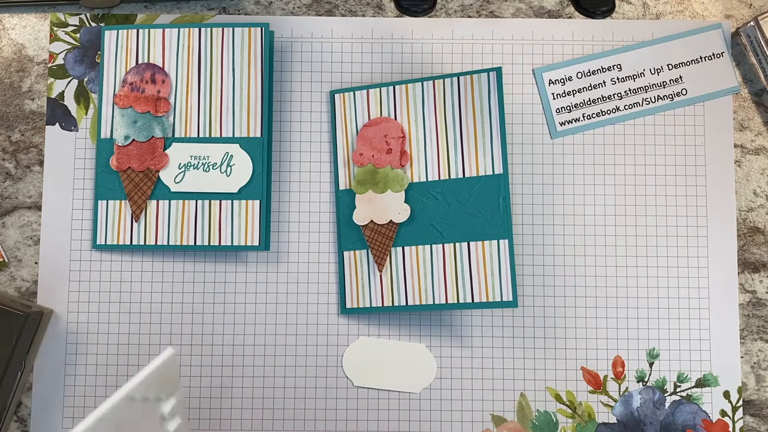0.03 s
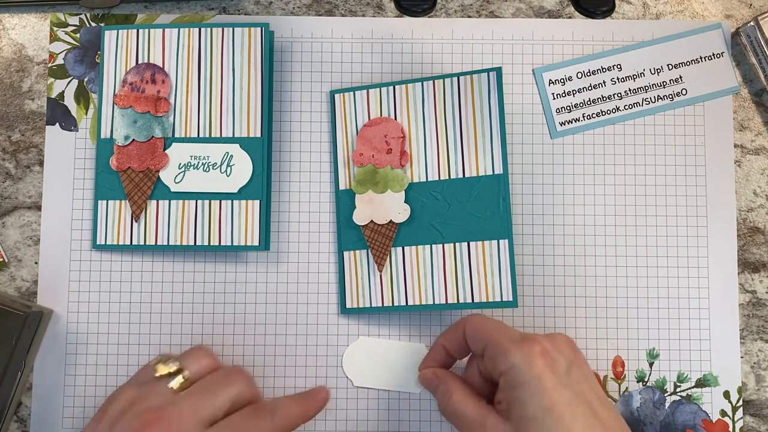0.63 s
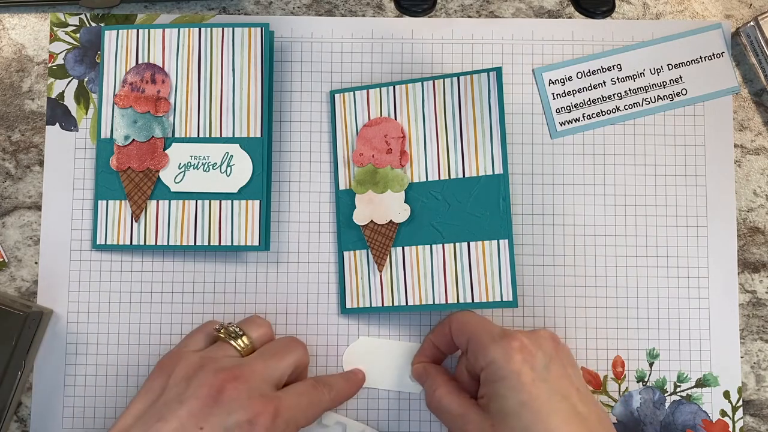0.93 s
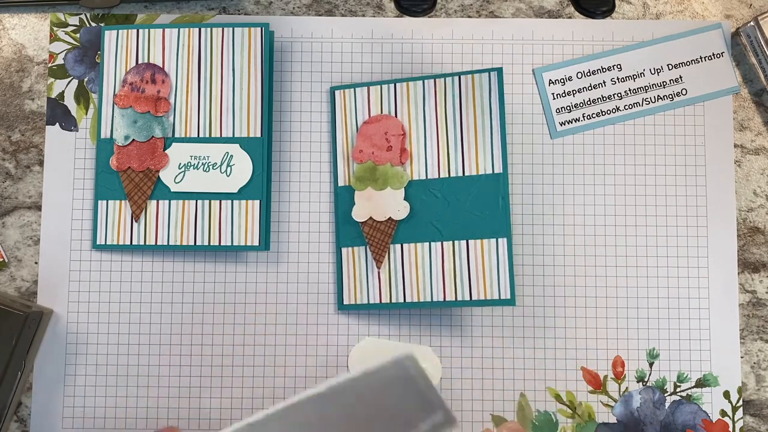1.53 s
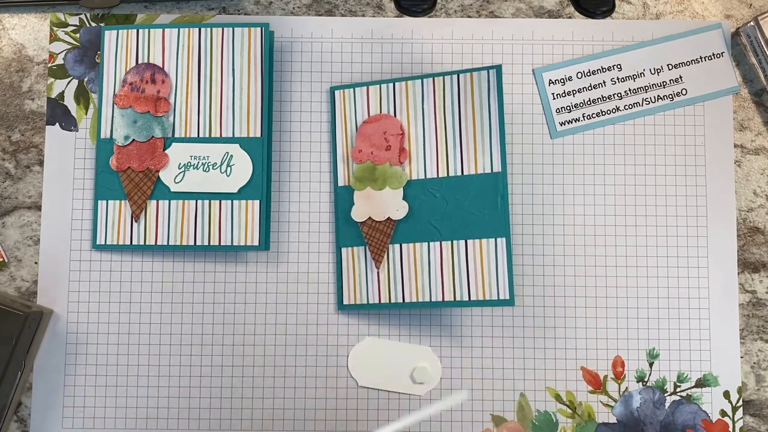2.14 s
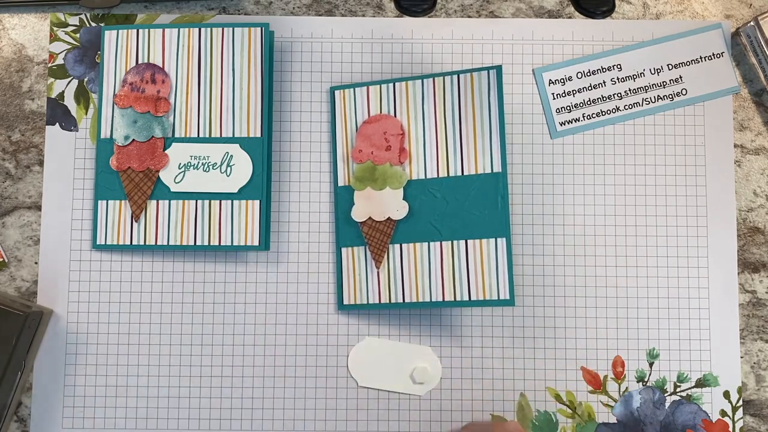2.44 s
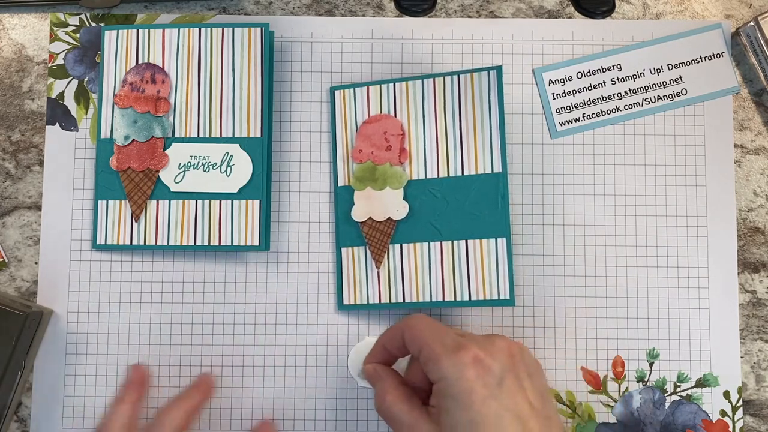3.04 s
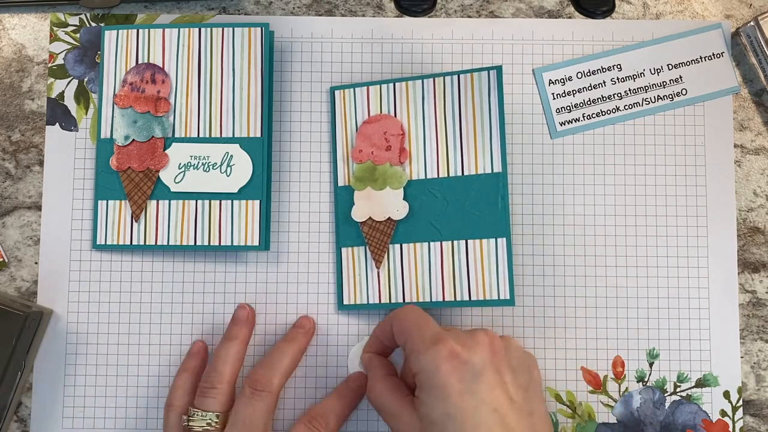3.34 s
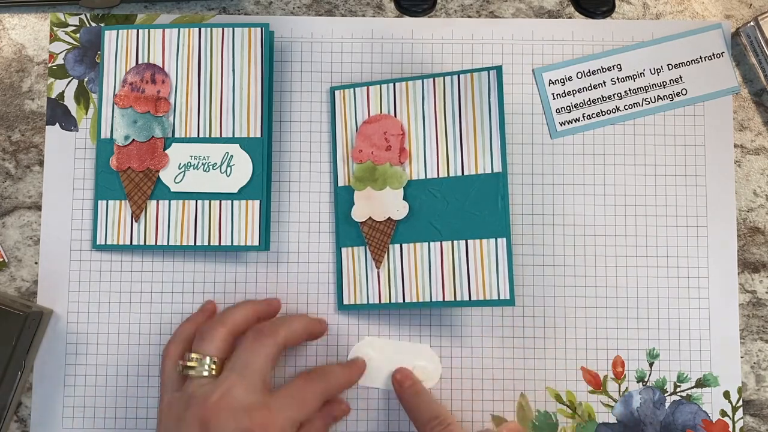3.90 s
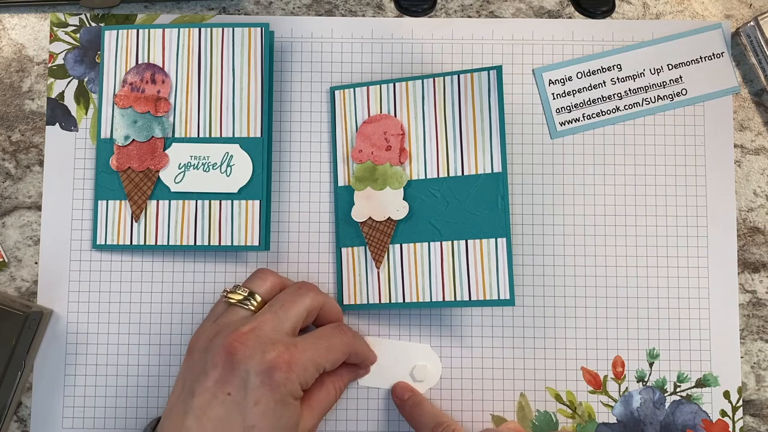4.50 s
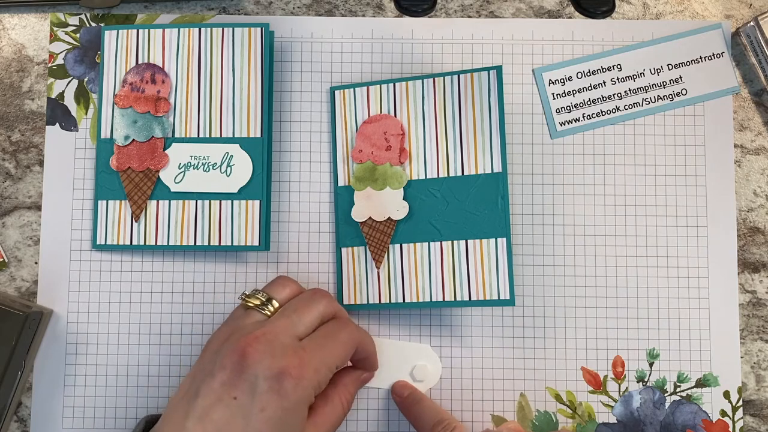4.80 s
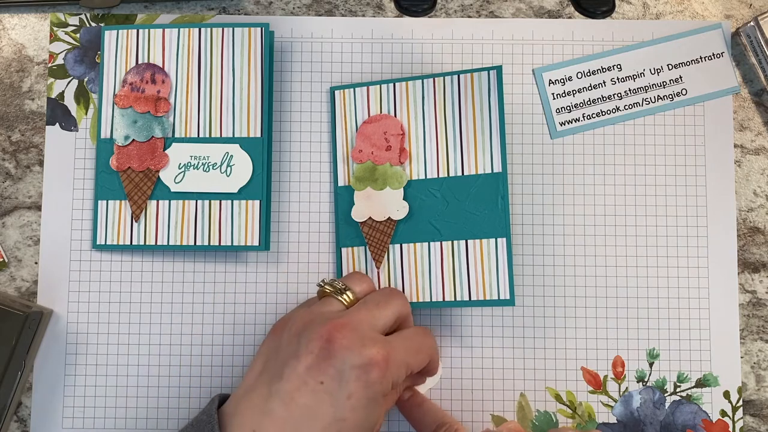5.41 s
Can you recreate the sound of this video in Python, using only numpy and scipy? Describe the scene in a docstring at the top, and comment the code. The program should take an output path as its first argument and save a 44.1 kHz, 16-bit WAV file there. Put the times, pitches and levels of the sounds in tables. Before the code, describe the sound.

In a small quiet room, a microphone over a desk picks up crisp little snaps and crackles of glue and backing paper letting go as foam dots are peeled off. Two snaps stand out, one early and one past the middle, with a floppy sheet softly set down between them. Fingers brush the card, hands bump the desk gently, and smaller clicks finish, all over a faint low hum.

```python
"""Sticking foam dots on a card tag

Foam adhesive dots are picked off their sheet and pressed onto a tag on a desk, in a small quiet room.
Glue and backing paper let go in sharp snaps, fingertips rub the paper, and the sheet lands with soft
knocks. Two low hums beat against each other. Two closely spaced microphone ports hang above the desk."""
import sys
import numpy as np
from scipy import signal
from scipy.fft import rfft, irfft
from scipy.io import wavfile
from scipy.ndimage import uniform_filter1d

SR = 44100
rng = np.random.default_rng(int(sys.argv[2]) if len(sys.argv) > 2 else 0)


def int16_out(signal):
    """Quantize to a 16-bit WAV file."""
    q = np.round(np.clip(np.atleast_2d(signal).T, -1, 1) * 32767)
    wavfile.write(sys.argv[1], SR, q.astype(np.int16))


N = 244755
TIME = np.arange(N) / SR

# Glue and paper letting go. Each row: start in seconds, peak in dB, tilt toward treble in dB per octave,
# trailing crackle in dB, bass boost in dB, note of the paper flap in Hz.
SNAPS = [(.1719, -38.5, -5.5, -20, 0, 5960), (.441, -38.5, 0, -14, -5, 7640),
         (0.696, -48.5, -16, 7, -21, 2960), (0.7958, -35.5, -3.5, -11, 4, 9500),
         (0.945, -41, 2, 2, -14, 11100), (0.97, -46, 10, 0, 2, 11500),
         (1.066, -28.5, 0.5, -9.5, -7.5, 11200), (1.1358, -4, 2.5, -1, 1.5, 11300),
         (1.1392, -17, -1, -0.5, -2, 9200), (1.1473, -19.5, -2.5, -1.5, -14.5, 7460),
         (1.5954, -34, -3, -2, 0.5, 11200), (2.054, -33, -1, -10, -5, 11100),
         (2.0626, -26.5, 6.5, 7, -4, 10660), (2.066, -34, -3.5, -3.5, 0, 10300),
         (2.0738, -27, -0.5, -13, 6.5, 7200), (2.083, -21.5, -2, -11, -4, 8600),
         (2.0863, -19.5, -6, 1, -17.5, 8720), (2.089, -22.5, 5, 7.5, 3, 10900),
         (2.487, -39, -15, 5, -26, 6030), (2.7006, -38, -13, -1.5, -20, 3900),
         (3.252, -41.5, 2, -7, -14.5, 7200), (3.391, -9.5, 0.5, 2.5, 1.5, 7640),
         (3.7345, -39.5, -5.5, -1, -20, 10000), (4.4105, -46, -2, -11, -2, 9900),
         (4.4296, -29.5, 3.5, 1.5, 7.5, 7940), (4.4685, -41.5, -4.5, -4, -15.5, 9460),
         (4.503, -37.5, 1.5, -8, -12.5, 9700), (4.518, -40.5, -2.5, -11, -15, 10740),
         (4.6146, -38, -1.5, -2, -17, 10800), (4.6412, -27.5, 18, -5, -4.5, 11000),
         (4.652, -38, 19, -8, -6, 10500), (4.6556, -15.5, -1, -3.5, -6.5, 7760),
         (4.662, -24, -2, -1, -24, 9500), (4.7195, -37.5, -1, -1, -14, 11300),
         (4.723, -24, -2, -0.5, -13, 8230), (4.7261, -37.5, -1, 4.5, 6, 7400),
         (5.1055, -32.5, 5, -4, 16, 9430), (5.377, -34.5, 6.5, -2, -6, 10000),
         (5.3858, -27.5, 8, -2, 6, 10550), (5.39, -27.5, 8.5, 5.5, 16, 9500),
         (5.4982, -48.5, 15, -0.5, 4.5, 11000), (5.5205, -46.5, -2, -7, -7, 11000),
         (5.531, -31.5, 10, 6, 4, 11100), (5.534, -25.5, 8.5, 3, 10, 10200)]
# The tone of a snap. Each row: frequency in Hz, level in dB.
SNAP_COLOUR = [(100, -35), (400, -21), (1100, -25.5), (2400, -22), (3200, -22.5), (4500, -15.5),
               (6000, -17.5), (7500, -7), (10000, 1), (11500, -5), (12800, -4), (15000, -14), (16500, -28)]


def snaps(lead_db=-11, lead_s=0.0017, crackle_s=0.0012, scatter_db=-9, scatter_s=0.0078,
          note_db=5, note_width=0.061, size=2048):
    """A few fibres give way, a glue strand breaks, more fibres follow; hands and desk scatter the sound."""
    out, hz, t = np.zeros(N), bins(size), TIME[:size]
    octaves = np.log2(np.clip(hz, 1000, 14000) / 10000)
    for start, db, tilt_db, crackle_db, bass_db, note_hz in SNAPS:
        first_fibres, later_fibres, paths = rng.standard_normal((3, size))
        bass = bass_db / (1 + (hz / 2400) ** 4)  # more moving paper gives more bass
        flap = note_db / (1 + ((hz / note_hz - 1) / note_width) ** 2)
        pulse = impulse(read(SNAP_COLOUR, hz) + tilt_db * octaves + bass + flap)
        pulse /= abs(signal.hilbert(pulse)).max()
        lead = amp(lead_db) * spray(first_fibres, np.exp(-t / lead_s))[::-1]
        crinkle_s = crackle_s * np.exp(-0.07 * (db + 10))  # weak snaps let go more slowly
        trail = amp(crackle_db) * spray(later_fibres, t * np.exp(-2 * t / crinkle_s))
        trail += amp(scatter_db) * spray(paths, np.sqrt(t) * np.exp(-t / scatter_s))
        snap = signal.fftconvolve(pulse, np.concatenate([lead, [1], trail]))
        add(out, start - size / SR, amp(db) * snap)
    return out


# Runs of tiny glue ticks. Each row: start in seconds, length in seconds, final level in dB.
PEELS = [(2.056, 0.035, -62), (4.43, 0.023, -55), (4.628, 0.044, -52.5), (4.68, 0.03, -58),
         (5.312, 0.093, -53)]


def peeling(growth_db_per_s=331, release_s=0.0051, tilt_db=4):
    """Thin glue strands break one after another, louder as the pull grows, until the dot comes free."""
    level = np.zeros(N)
    for start, length, db in PEELS:
        remaining = start + length - TIME
        pull = amp(db - growth_db_per_s * np.maximum(remaining, 0))
        level += (TIME > start) * pull * np.exp(np.minimum(remaining, 0) / release_s)
    colour = [(hz, db + tilt_db * np.log2(hz)) for hz, db in SNAP_COLOUR]
    return level * unit(tint(friction(per_s=1500, spread_db=4, hiss=0.11), colour))


# Sheet and hand landing. Each row: start in seconds, level in dB, tilt toward treble in dB per octave,
# rise in seconds, seconds for the flutter to fade 60 dB, hollow note in Hz, that note's gain in dB.
KNOCKS = [(0.107, -66, -14, 0.0062, 0.047, 395, -8), (0.223, -64, -9, 0.0042, 0.11, 421, -12),
          (0.437, -52.5, -0.5, 0.0044, 0.033, 855, -3), (.446, -57.5, -1, 0.0033, 0.055, 250, 1),
          (0.533, -56, -2.5, 0.0025, 0.018, 385, 0.5), (1.314, -65, -6.5, 0.002, .1, 410, -4),
          (1.34, -61, -2.5, 0.0024, 0.11, 394, -6), (1.6901, -51.5, -0.5, 0.0053, 0.076, 464.7, 6),
          (1.7717, -57, -1, 0.0028, 0.027, 391, 0.5), (2.077, -63.5, -6, 0.0049, 0.098, 417, -8),
          (2.4857, -55.5, -1, .0033, 0.18, 425, -0.5), (2.494, -53.5, 0.5, 0.0023, 0.25, 212.4, 6),
          (2.537, -50, -2, 0.0047, 0.17, 536, -1.5), (2.714, -69, 1, 0.0082, 0.29, 661, -1),
          (3.39, -71.5, -5.5, 0.0036, 0.017, 182, 5.5), (3.736, -77, 2, 0.013, 0.23, 1050, 1),
          (4.655, -66.5, 1, 0.0014, 0.047, 476, 1.5), (4.733, -71, 2.5, 0.004, 0.11, 955, -4.5)]
# The tone of a knock. Each row: frequency in Hz, level in dB.
KNOCK_COLOUR = [(80, -20.5), (200, -1.5), (350, -5.5), (550, -4), (750, -4.5), (1100, -8), (2000, -14.5),
                (3500, -20), (7000, -26.5), (11000, -30), (16000, -64)]
# Where the card stack rings. Each row: frequency in Hz, width in Hz, strength in dB.
CARD_RESONANCES = [(343, 60, 5), (530, 90, -1), (950, 260, 0.5), (1250, 130, -6), (1600, 250, -6),
                   (2000, 150, -2)]


def knocks(bend_s=0.011, swell_s=0.011, sag=0.14, waver=0.088, overtone=2.1, overtone_db=-6, size=8192):
    """The floppy sheet slaps and flutters, ringing the card stack, then flexes with a hollow note."""
    out, hz, t = np.zeros(N), bins(size), TIME[:size]
    ring = 1 + sum(amp(db) / (1 + (2 * (hz - f) / width) ** 2) for f, width, db in CARD_RESONANCES)
    body_db = read(KNOCK_COLOUR, hz) + 20 * np.log10(ring)
    octaves = np.log2(np.clip(hz, 400, 6000) / 400)
    # low bending waves travel slowly, so each slap is a short falling chirp
    delay = 2 * bend_s / (1 + hz / 300)
    chirp = np.exp(-2j * np.pi * np.cumsum(delay) * hz[1])
    age = t / swell_s
    fade = np.exp(-age ** 2 / 2)
    for start, db, tilt_db, rise, t60, note_hz, note_db in KNOCKS:
        contacts = rng.standard_normal(size)
        slap = irfft(chirp / np.hypot(1, hz * rise / 4.4))  # a slower landing is duller
        flutter = spray(contacts, (1 - np.exp(-(t / rise) ** 2)) * amp(-60 * t / t60))
        knock = signal.fftconvolve(slap + flutter, impulse(body_db + tilt_db * octaves))[:size]
        # the grip sets the note, which wavers and sinks as the sheet relaxes
        wobble = waver * unit(uniform_filter1d(contacts, size=200))
        phase = 2 * np.pi * np.cumsum(note_hz * (1 + sag * np.exp(-age) + wobble)) / SR
        note = 2 * age * fade * (np.sin(phase) + amp(overtone_db) * fade * np.sin(overtone * phase))
        add(out, start, amp(db) * (knock / knock[:size // 8].std() + amp(note_db) * note))
    return out


# Short bands of paper noise. Each row: middle in seconds, half length in seconds, level in dB,
# centre frequency in Hz, width in octaves.
PAPER_NOISES = [(0, 0.034, -63, 5260, 1.16), (0.148, 0.098, -74, 3080, 1.34), (0.747, 0.029, -65, 3760, 9),
                (0.83, 0.035, -72.5, 4000, 4.5), (0.927, 0.025, -63, 10400, 0.33),
                (0.986, 0.02, -72.5, 1660, 0.82), (1.186, 0.041, -63, 5650, 0.73),
                (1.277, 0.026, -70, 3970, 0.75), (1.31, 0.012, -61, 4540, 1.45),
                (1.603, 0.013, -66, 3920, 0.9), (1.836, 0.019, -64.5, 3720, 3.1),
                (2.088, 0.015, -52.5, 6040, 0.82), (2.492, 0.0045, -50.5, 2340, 0.88),
                (2.541, 0.0032, -51.5, 2000, 0.52), (2.542, 0.002, -48, 3860, 0.17),
                (2.553, 0.018, -52, 1670, 0.6), (2.572, 0.042, -59.5, 3020, 1.6),
                (2.605, 0.088, -74, 3820, 1.1), (2.726, 0.019, -61.5, 5900, 3.2),
                (3.443, 0.042, -64, 5750, 0.8), (4.717, 0.048, -72, 4570, 0.76)]


def paper_noises(skirt_db=-18):
    """Short bands of paper noise: brushing swells, the rasp of peeling, brief clacks as the sheet lands."""
    out, hz = np.zeros(N), bins(N)
    spectrum = rfft(friction(per_s=1500, spread_db=4.2, hiss=1))
    for middle, half, db, centre_hz, width_octaves in PAPER_NOISES:
        band = np.exp(-(np.log2((hz + 1) / centre_hz) / width_octaves) ** 2)
        band += amp(skirt_db) / np.hypot(1, hz / centre_hz)
        out += amp(db) * unit(irfft(spectrum * band, N)) * np.exp(-((TIME - middle) / half) ** 2)
    return out


# Finger strokes. Each row: start in seconds, length in seconds, level in dB at average pressure.
RUBS = [(0, 0.0072, -68), (0.148, 0.11, -79.5), (0.438, 0.55, -76.5), (0.736, 0.02, -70.5),
        (0.862, 0.031, -67.5), (0.97, 0.2, -67), (1.17, 0.14, -62), (1.363, 0.014, -73), (1.61, .2, -76.5),
        (1.817, .02, -70.5), (1.951, 0.19, -68), (2.543, 0.025, -66), (2.922, 0.068, -84.5),
        (3.238, 0.033, -77.5), (3.34, 0.19, -69), (3.786, .025, -77), (3.883, 0.18, -75),
        (4.157, 0.13, -70.5), (4.409, 0.034, -74), (4.65, 0.038, -69), (5.134, 0.062, -76),
        (5.353, 0.057, -87)]
# The tone of rubbing. Each row: frequency in Hz, level in dB.
RUB_COLOUR = [(300, -31.5), (1500, -16.5), (3000, -21), (5500, -17.5), (8000, -6), (10300, -0.5),
              (12000, -4), (13500, -13), (16000, -28)]


def rubbing(attack_s=0.027, release_s=0.055, resting_db=-91, pressure_db=4.5):
    """Soft fingertips drag on paper and foam with a fine hiss that follows their unsteady pressure."""
    level = np.full(N, amp(resting_db))  # resting fingers still stir the paper
    for start, length, db in RUBS:
        fade = np.maximum(start - TIME, 0) / attack_s + np.maximum(TIME - start - length, 0) / release_s
        level = np.maximum(level, amp(db) * np.exp(-fade))
    pressure = np.interp(TIME, np.arange(300) / 50, rng.standard_normal(300))
    drag = unit(tint(friction(per_s=5000, spread_db=3, hiss=1), RUB_COLOUR))
    return level * amp(pressure_db * pressure) * drag


# A fingernail on card and foam. Each row: middle in seconds, level in dB, chatter note in Hz.
SCRAPES = [(0.619, -59, 2450), (1.686, -58, 2000), (3.828, -56, 6370), (4.11, -59.5, 10200),
           (5.011, -69, 2420)]


def scrapes(half_s=0.0045, note_db=13, note_width=0.086):
    """A nail slips in a quick run of catches, and the edge under it chatters at its own note."""
    out, hz = np.zeros(N), bins(N)
    spectrum = rfft(tint(friction(per_s=2500, spread_db=3, hiss=0.65), RUB_COLOUR))
    for middle, db, note_hz in SCRAPES:
        edge = amp(note_db / (1 + ((hz / note_hz - 1) / note_width) ** 2))
        out += amp(db) * unit(irfft(spectrum * edge, N)) * np.exp(-((TIME - middle) / half_s) ** 2)
    return out


# Hands settling on the desk. Each row: start in seconds, level in dB.
BUMPS = [(.44, -44.5), (.962, -47), (1.152, -47.5), (3.28, -51.5), (3.405, -46), (3.803, -49.5),
         (4.138, -43.5)]


def bumps(desk_hz=72, swell_s=0.011):
    """The soft weight of a hand sways the desk top for a few low cycles."""
    out, t = np.zeros(N), TIME[:SR // 2]
    sway = t / swell_s * np.exp(1 - t / swell_s) * np.sin(2 * np.pi * desk_hz * t)
    for start, db in BUMPS:
        add(out, start, amp(db) * sway)
    return out


# Motor hum, mains hum and the octave above the mains. Each row: frequency in Hz, level in dB.
HUMS = [(52.53, -55.4), (59.91, -56.5), (119.82, -80)]
# The tone of room noise that both ports share. Each row: frequency in Hz, level in dB.
AIR_SHARED = [(20, -26), (38, -13.5), (52, 1.5), (70, 4), (100, -6), (160, -13), (300, -21), (600, -30),
              (1300, -41.5), (3000, -46.5), (7000, -48.5), (10300, -50), (13000, -62), (16000, -73)]
# The tone of room noise that is opposite in the two ports. Each row: frequency in Hz, level in dB.
AIR_OPPOSED = [(20, -20), (60, 8), (100, -8), (300, -18), (900, -26), (3000, -38.5), (7000, -39),
               (10300, -41), (16000, -48.5)]


def background(in_step_s=0.11, shared_db=-63.2, opposed_db=-70.2):
    """A motor and the mains hum a few Hz apart and throb, over faint room noise."""
    hum = sum(amp(db) * np.sqrt(2) * np.cos(2 * np.pi * hz * (TIME - in_step_s)) for hz, db in HUMS)
    shared = hum + amp(shared_db) * unit(tint(rng.standard_normal(N), AIR_SHARED))
    opposed = amp(opposed_db) * unit(tint(rng.standard_normal(N), AIR_OPPOSED))
    return np.array([shared + opposed, shared - opposed])


# How long the room rings. Each row: frequency in Hz, seconds to fade 60 dB.
ROOM_FADE = [(150, 0.96), (600, 0.76), (2500, 0.21), (6000, 0.065), (10000, 0.2), (15000, 0.031)]
# The tone of the room's echoes. Each row: frequency in Hz, gain in dB.
ROOM_COLOUR = [(200, -2), (450, 1.5), (1000, 7), (2200, 6), (4000, 7.5), (7000, 8), (10000, -3.5)]
# The part of the echoes that arrives from all around. Each row: frequency in Hz, gain in dB.
ALL_AROUND = [(200, -9.5), (1000, -6), (4000, 2.5), (10000, -6)]


def reflections(fingers, sheet, desk_db=-15, desk_fade_s=0.057, fingers_db=-18.5, sheet_db=-15.5):
    """Sound bounces off desk and room; the sheet, off at the desk's edge, stirs more of the room."""
    desk = amp(desk_db) * echoes(fingers + sheet, [(100, desk_fade_s), (16000, desk_fade_s)], 0.0026)
    into_room = tint(amp(fingers_db) * fingers + amp(sheet_db) * sheet, ROOM_COLOUR)
    frontal, around = desk + echoes(into_room, ROOM_FADE, delay_s=0.0065)
    return ports(frontal) + tint(around, ALL_AROUND) * np.array([[1], [-1]])


def echoes(x, fade_times, delay_s, drift_per_s=0.9):
    """Two sets of dense, fading echoes whose pattern drifts as the hands move."""
    hz, t, noise = signal.stft(rng.standard_normal((2, 2, SR // 2)), SR, nperseg=256)
    tails = signal.istft(noise * amp(-60 * t / read(fade_times, hz)[:, None]), SR, nperseg=256)[1]
    tails /= np.linalg.norm(tails, axis=2, keepdims=True)
    tails = np.pad(tails, ((0, 0), (0, 0), (round(delay_s * SR), 0)))
    turn = np.pi * drift_per_s * TIME
    feeds = x * np.array([np.cos(turn), np.sin(turn)])
    return signal.fftconvolve(feeds[:, None], tails, axes=2).sum(0)[:, :N]


# The left port compared with the right. Each row: frequency in Hz, phase lead in radians, gain in dB.
PORTS = [(100, 0, 0), (500, .6, 2.8), (780, 1.8, 3), (2500, .2, 4), (4000, 1.4, 4.8), (6000, .1, 3),
         (7600, -1.2, 4), (8100, -3.3, 0), (9000, -3.8, -.3), (10000, -5.3, 0), (11500, -6.8, 0),
         (14000, -10.2, 0), (15200, -12.4, 0)]


def ports(x):
    """Sound from the desk reaches the two microphone ports with different timing and strength."""
    table, hz = np.array(PORTS), bins(N)
    lead, gain_db = read(table[:, :2], hz), read(table[:, ::2], hz)
    left = amp(gain_db / 2) * np.exp(0.5j * lead)
    return irfft(rfft(x) * np.array([left, 1 / left]), N)


def friction(per_s, spread_db, hiss):
    """Paper fibres catch and slip in tiny clicks of uneven size, over a smooth hiss."""
    size = amp(spread_db * np.minimum(rng.exponential(1, N), 3))
    slips = size * rng.standard_normal(N) * (rng.random(N) < per_s / SR)
    return unit(unit(slips) + hiss * rng.standard_normal(N))


def spray(noise, envelope):
    """A burst of tiny random pulses that follows a loudness curve, with a total energy of one."""
    for _ in range(6):  # each pass evens out the spectrum
        noise = irfft(np.exp(1j * np.angle(rfft(noise * envelope))))
    burst = noise * envelope
    return burst / np.linalg.norm(burst)


def impulse(db):
    """The most compact click that starts at time zero and has this spectrum."""
    cepstrum = irfft(np.log(amp(db)))
    half = len(cepstrum) // 2
    cepstrum[1:half] *= 2
    cepstrum[half + 1:] = 0
    return irfft(np.exp(rfft(cepstrum)))


def tint(x, points):
    """Turns each frequency of a full-length sound up or down by a table."""
    return irfft(rfft(x) * amp(read(points, bins(N))), N)


def read(points, hz):
    """Reads between a table's rows on a log-frequency scale."""
    f, value = np.transpose(points)
    return np.interp(np.log(hz + 1), np.log(f + 1), value)


def bins(size):
    """The frequencies in the spectrum of that many samples."""
    return np.fft.rfftfreq(size, 1 / SR)


def amp(db):
    """Turns decibels into a gain."""
    return 10 ** (np.asarray(db) / 20)


def unit(x):
    """Scales a sound to an average (rms) level of one."""
    return x / np.sqrt(np.mean(x ** 2) + 1e-20)


def add(mix, start_s, sound):
    """Mixes a sound in at its start time."""
    part = mix[max(round(start_s * SR), 0):][:len(sound)]
    part += sound[:len(part)]


def scene():
    """Fingers and sheet at work under the microphone, with their echoes and the room's hum."""
    fingers = snaps() + peeling() + scrapes() + rubbing()
    sheet = knocks() + paper_noises()
    return ports(fingers + sheet + bumps()) + reflections(fingers, sheet) + background()


def record(dry, cutoff_hz=16300):
    """Cuts off the very highest treble."""
    lowpass = signal.firwin(255, cutoff_hz, window=("kaiser", 9), fs=SR)
    return signal.oaconvolve(dry, lowpass[None], "same")


dry = scene()
out = record(dry)
int16_out(out)
```